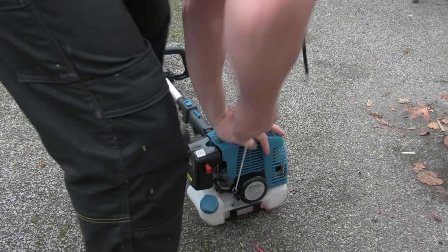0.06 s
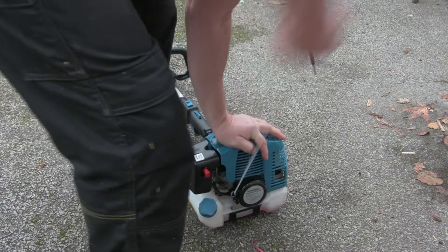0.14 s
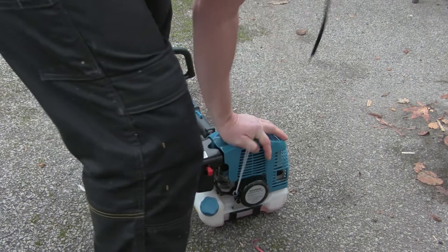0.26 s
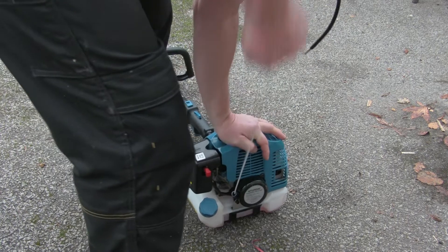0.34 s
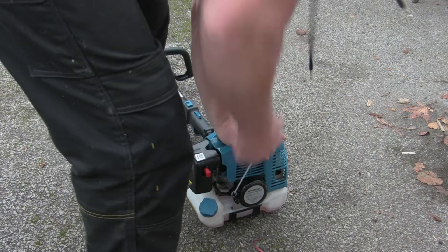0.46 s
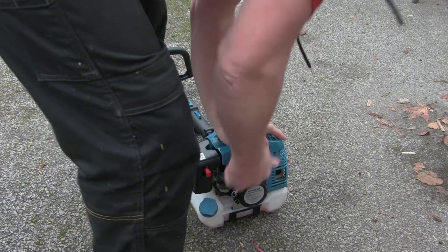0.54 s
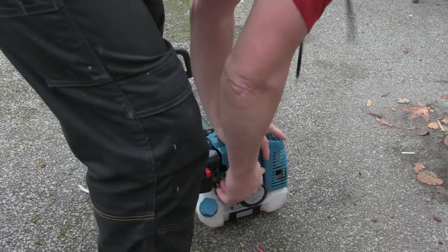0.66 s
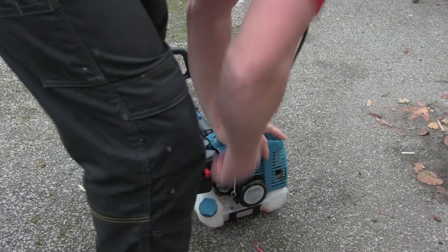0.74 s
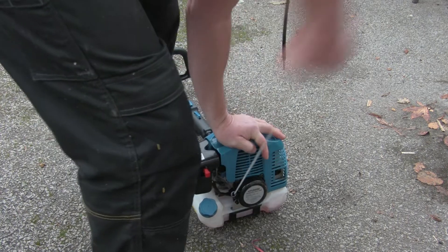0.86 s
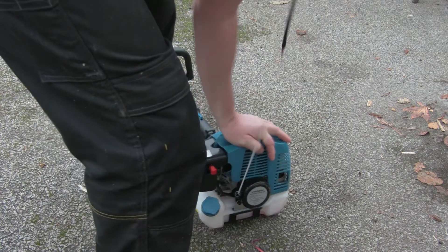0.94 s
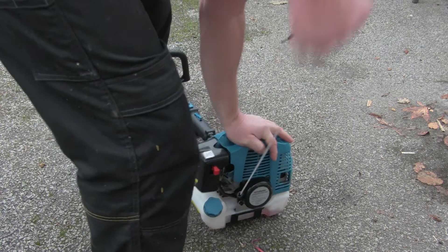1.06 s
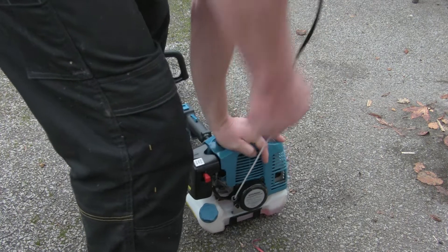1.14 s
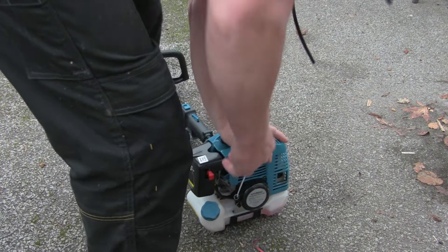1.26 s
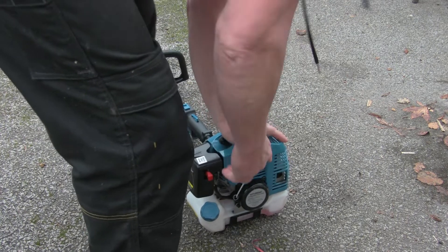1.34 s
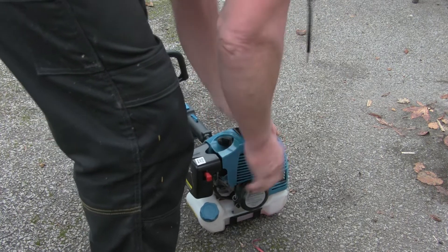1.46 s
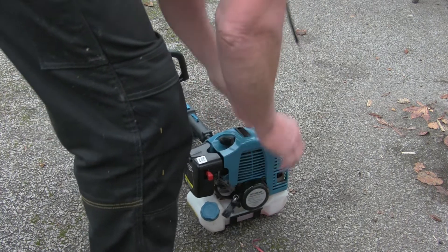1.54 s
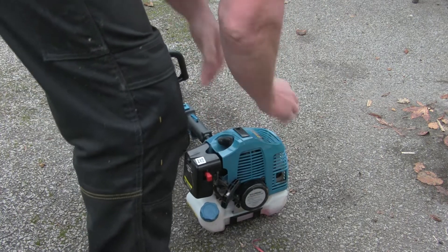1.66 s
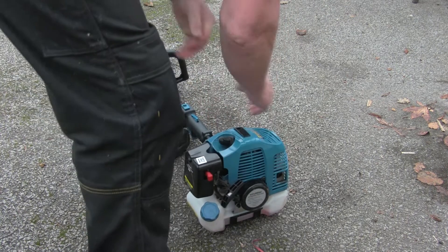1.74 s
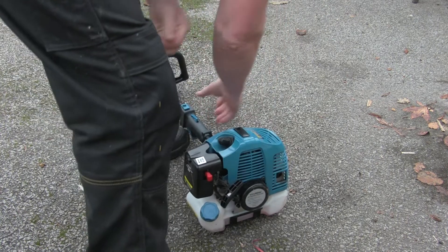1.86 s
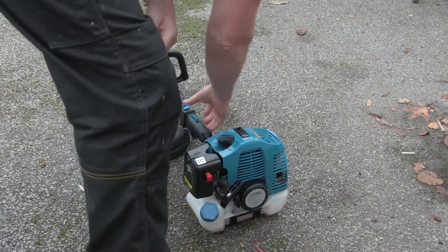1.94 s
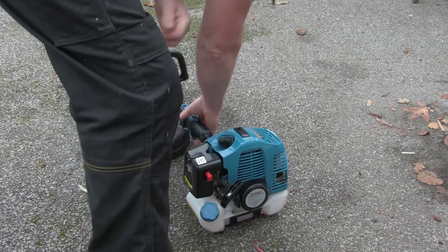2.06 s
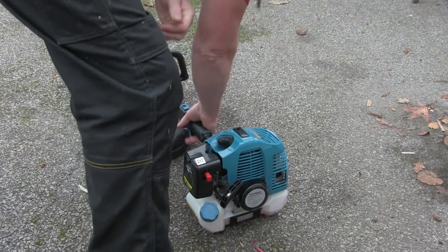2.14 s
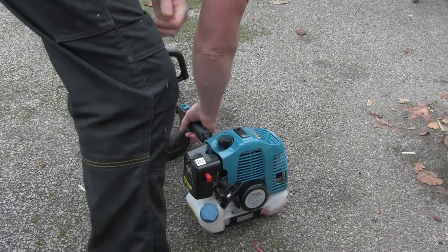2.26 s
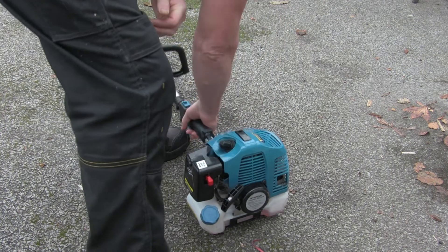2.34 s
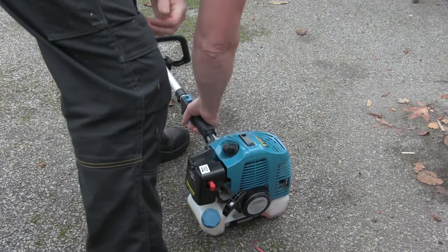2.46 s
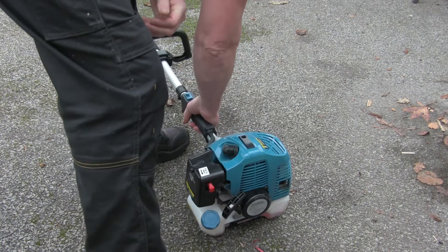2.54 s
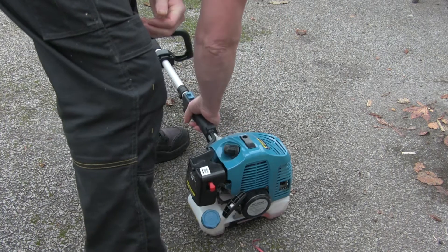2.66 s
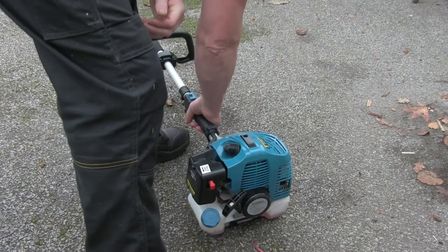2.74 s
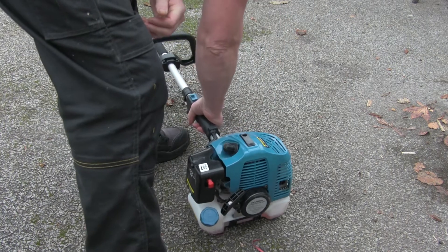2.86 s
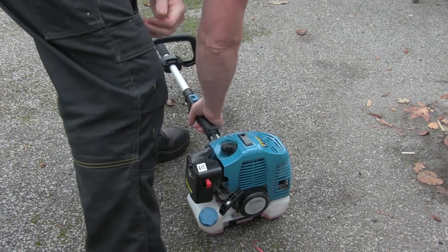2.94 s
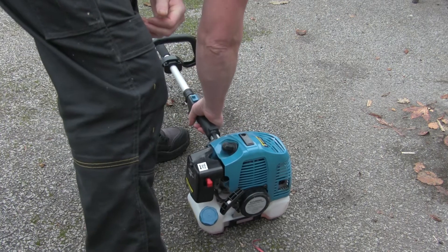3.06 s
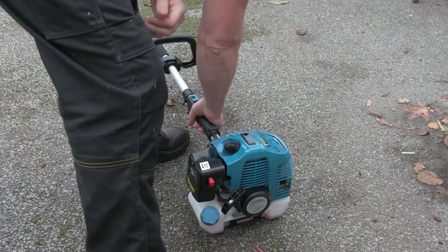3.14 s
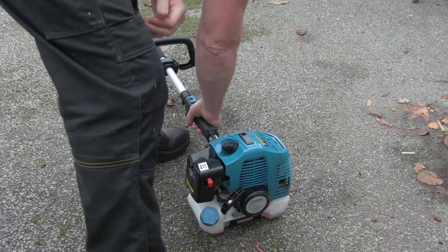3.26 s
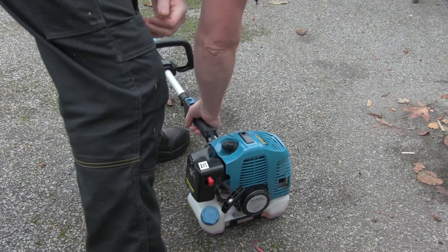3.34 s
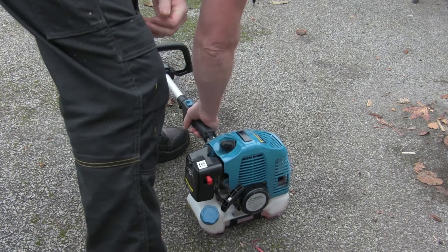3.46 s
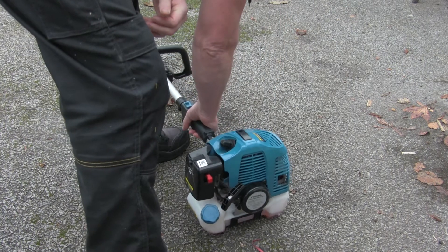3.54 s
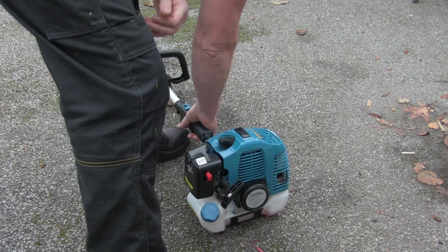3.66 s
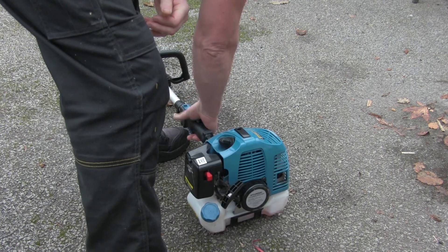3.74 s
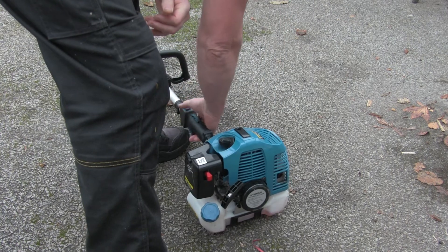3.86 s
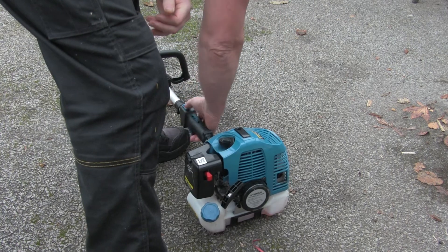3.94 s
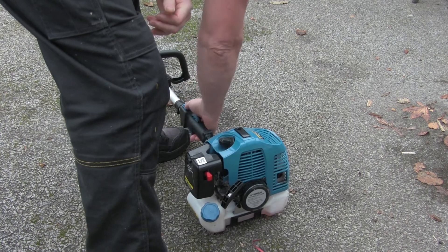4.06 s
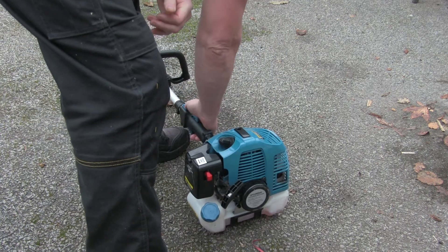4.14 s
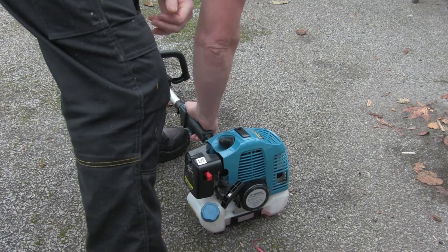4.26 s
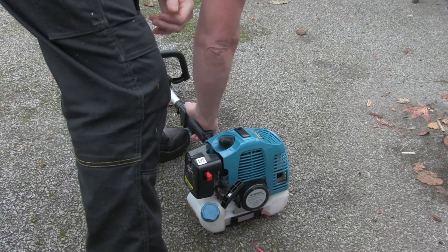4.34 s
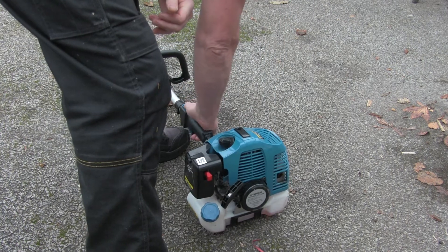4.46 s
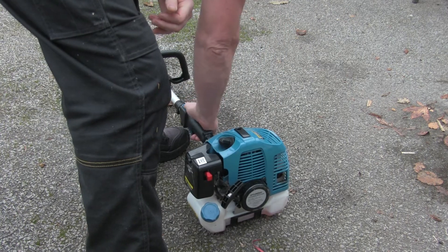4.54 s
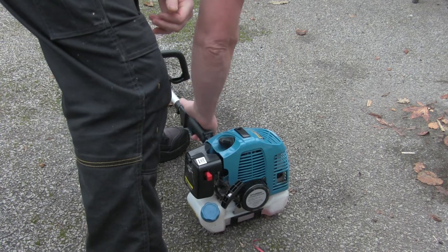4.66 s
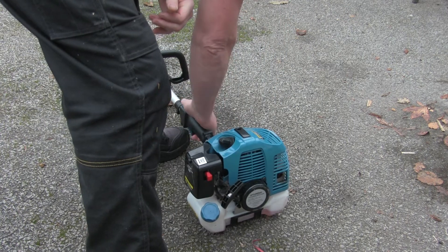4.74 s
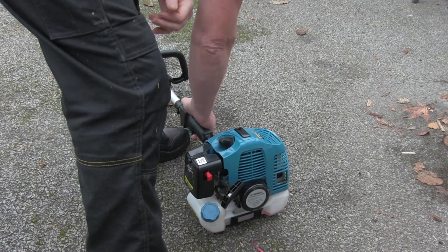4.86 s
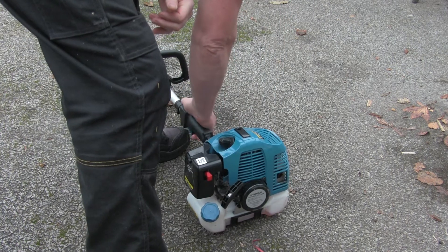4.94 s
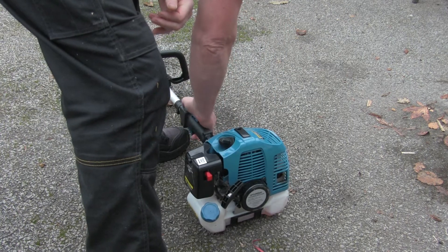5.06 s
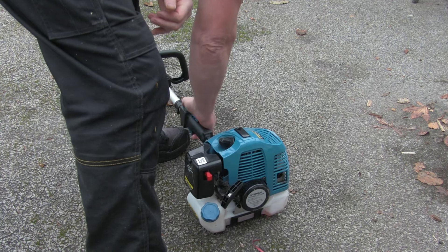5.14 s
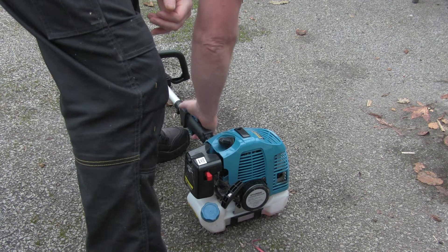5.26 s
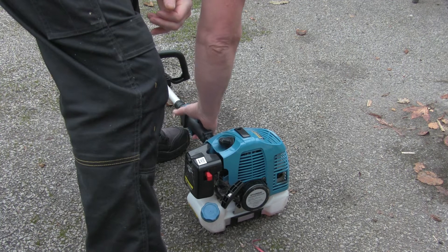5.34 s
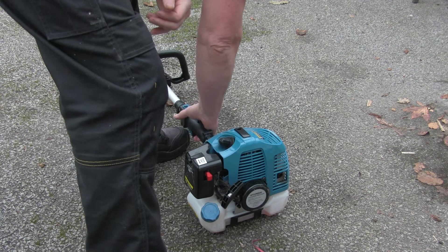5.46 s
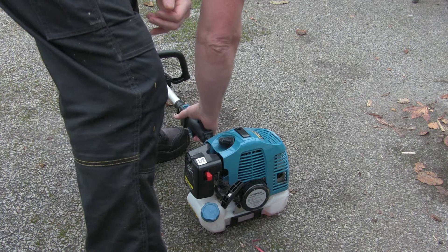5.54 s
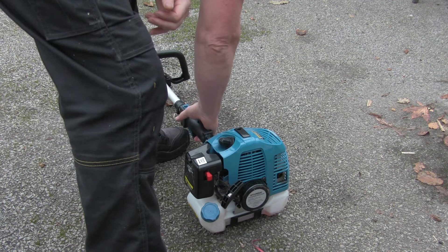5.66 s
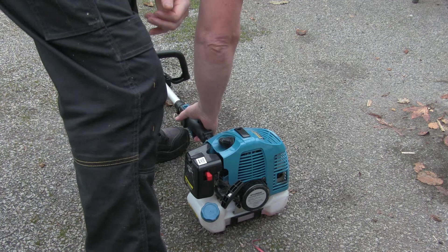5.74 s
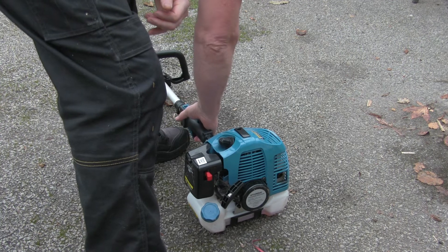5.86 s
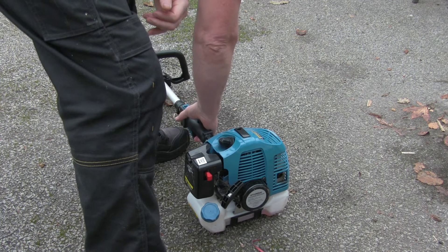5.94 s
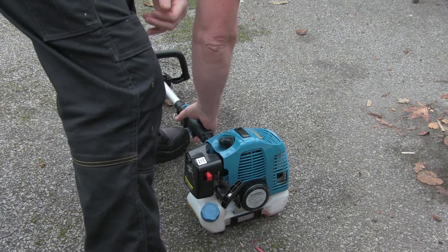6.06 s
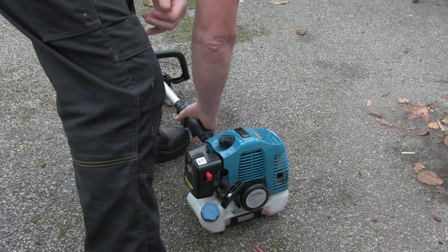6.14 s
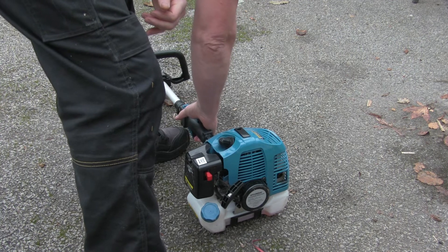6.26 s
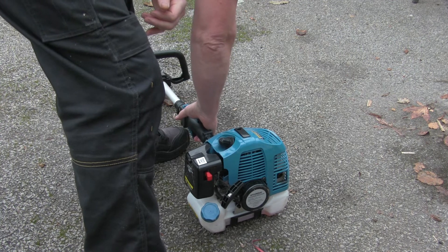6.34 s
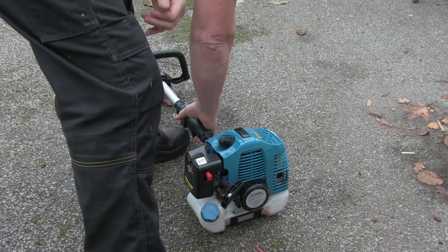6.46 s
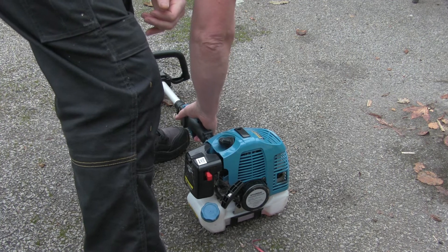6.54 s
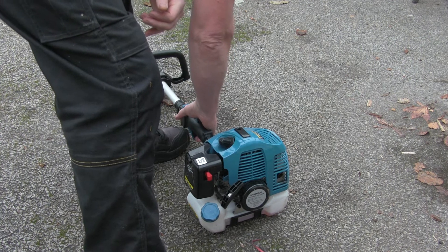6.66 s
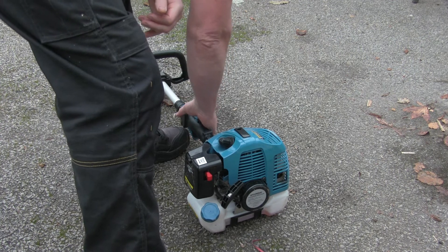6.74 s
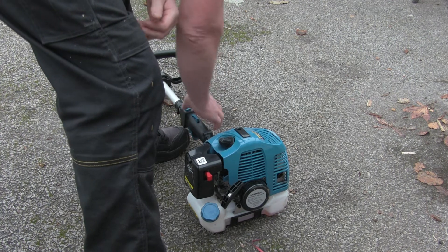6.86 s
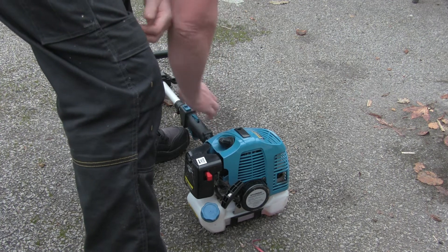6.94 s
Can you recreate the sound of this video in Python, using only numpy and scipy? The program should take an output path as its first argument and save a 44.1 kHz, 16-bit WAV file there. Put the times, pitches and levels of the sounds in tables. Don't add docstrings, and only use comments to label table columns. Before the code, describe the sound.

Close outdoor stereo, machine slightly right of centre, short scatter from ground and walls, faint far traffic and hiss throughout. From 0.1 s the first cord pull: gritty rub, housing rocking, and six or seven hollow low muffler puffs about 30 ms apart, slowing until 0.4. Pawls slap, then ratchet brightly on steel at 0.39-0.62 as the cord rewinds. The handle bumps plastic at 0.65; a hard snap at 0.8 starts the second pull, chuffing 0.84-1.18, ratcheting 1.16-1.4. The engine never fires. At 1.48-1.66 the handle drops back, a snap and several clattering bounces. Then quiet: tiny finger ticks and soft rubbing from 1.7, a grip shift at 2.33, a sharp trigger snap with ringing tube at 2.58. At 3.7 the shaft tilts with a rattle and knocks; small clicks at 4.28 and 4.98. Very faint bird whistles, falling at 5.4, rising at 6.0; only traffic remains until 7.

```python
import sys
import numpy as np
from scipy import signal
from scipy.fft import rfft, irfft, next_fast_len
from scipy.io import wavfile
from scipy.ndimage import map_coordinates

SR = 44100
rng = np.random.default_rng(int(sys.argv[2]) if len(sys.argv) > 2 else 0)


def makeup_ratio(level_db):
    decades = np.asarray(level_db, float) / 20
    return 10 ** decades


def output_pcm(signal):
    pcm = np.clip(np.atleast_2d(signal).T, -1, 1) * 32767
    wavfile.write(sys.argv[1], SR, np.round(pcm).astype(np.int16))


N = 309141

# start [s], peak [dB], rim ring [dB], wall ring [dB].
RATCHET = [(.389, -8, -24, -43), (.4055, 0, -20.5, -25), (.4194, -4.5, -19, -15.5),
           (.4354, -3, -17.5, -11.5), (.4474, -6.5, -8.5, -15.5), (.4604, -6.5, -16, -22.5),
           (.4723, -1, -22.5, -18.5), (.4874, -3.5, -25, -21.5), (.5132, -6, -24, -24),
           (.5427, -11, -24.5, -20.5), (.5756, -8.5, -28.5, -28.5), (.623, -16, -36.5, -37.5),
           (1.1568, -9, -27.5, -40), (1.1737, -2.5, -15.5, -26.5), (1.1874, -2, -18.5, -20),
           (1.2024, -4, -24.5, -13), (1.2161, -6.5, -18, -26), (1.2314, -6, -12.5, -22.5),
           (1.2454, -7.5, -11, -19.5), (1.2604, -5, -21, -21), (1.2744, -17.5, -35.5, -29),
           (1.3384, -11, -37, -40.5), (1.3962, -10.5, -34.5, -43)]
# start [s], peak [dB], rim ring [dB], wall ring [dB].
CATCHES = [
    (0.2427, -4.5, -21, -33),
    (0.2557, -9, -23, -32),
    (0.3006, -5, -26.5, -32.5),
    (.3237, -0.5, -20.5, -32),
    (.9773, -3.5, -19, -33.5),
    (1.0278, -10.5, -29.5, -29),
    (1.0738, -5.5, -18, -20.5),
    (1.094, .5, -18.5, -20),
]
# start [s], peak [dB], knock [dB], loudest note [Hz], note level [dB].
BUMPS = [
    (0.6501, -7, 0, 1103, -15),
    (0.6868, -17.5, -2, 1713, -23.5),
    (1.5135, -12, -11, 916.4, -10.5),
    (1.5328, -1, -12.5, 826.4, -9.5),
    (1.5528, -1.5, -18, 1130, -14),
    (1.562, -10, -10, 3566, -12),
    (1.5799, -11.5, -18.5, 4425, -20),
    (1.6005, -12.5, 6.5, 345.6, -9.5),
    (1.603, -28.5, -8.5, 1164, -10),
    (1.6624, -17.5, -16.5, 3916, -24.5),
]
# start [s], peak [dB], bright part [dB], note [Hz].
TICKS = [(1.7308, -35, -24.5, 4100), (1.766, -38, -20.5, 3800), (1.8393, -32.5, -34, 3460),
         (1.8579, -36.5, -21, 3500), (2.082, -34.5, -9, 4160), (2.2015, -34, -26, 3750),
         (2.5023, -38, -0.5, 4506), (2.5282, -36, -9, 3230), (2.543, -42.5, 0.5, 3800),
         (3.4254, -42, -24, 4140), (3.469, -46, -18, 4100), (3.515, -51.5, -1, 3775),
         (3.5808, -48, 1, 3540), (3.6706, -37.5, 3, 4410), (4.2138, -39, -9.5, 3366),
         (4.6292, -41.5, 1, 3800), (4.974, -28.5, -16, 4020), (4.986, -30, -14, 3320)]
TICK_T60_S = 0.0386


def unit(x):
    return x / np.sqrt(np.mean(x ** 2) + 1e-20)


def along(points, hz):
    f, v = np.transpose(points)
    return np.interp(np.log(hz + 1), np.log(f + 1), v)


def curves(rows):
    s, *cols = np.transpose(rows)
    return [np.interp(np.arange(N) / SR, s, col) for col in cols]


def wobble(rate_hz):
    knots = rng.standard_normal(int(N * rate_hz / SR) + 4)
    return map_coordinates(knots, [np.arange(N) * rate_hz / SR])


def filtered(x, response):
    m = next_fast_len(N + SR // 2)
    gain = response(np.fft.rfftfreq(m, 1 / SR))
    gain = gain / np.sqrt(np.mean(abs(gain) ** 2, -1, keepdims=True))
    return irfft(rfft(x, m) * gain, m)[..., :N]


def resonances(peaks):
    def response(f):
        return sum((-1) ** k * makeup_ratio(db) * 1j * f * width / (hz * hz - f * f + 1j * f * width)
                   for k, (hz, width, db) in enumerate(peaks))
    return response


def nearby(side_db):
    mid, side = rng.standard_normal((2, N))
    side = makeup_ratio(side_db) * side
    return np.array([mid + side, mid - side])


def rush(spectrum):
    # frequency [Hz], left-right likeness [0-1].
    alike = [(60, .9), (290, 0.85), (640, 0.56), (1400, 0.5), (3100, 0.088), (7000, 0.757), (15000, 0.36)]
    m = next_fast_len(N)
    hz = np.fft.rfftfreq(m, 1 / SR)
    turn = np.arccos(np.clip(along(alike, hz), -1, 1)) / 2
    gain = makeup_ratio(along(spectrum, hz)) * [np.cos(turn), np.sin(turn)]
    mid, side = irfft(rfft(rng.standard_normal((2, m))) * gain, m)[:, :N]
    return unit(np.array([mid + side, mid - side]))


def bursts(times, dbs, t60s, holds, crack_db):
    power, t = np.zeros(N + SR), np.arange(SR // 4) / SR
    crack = makeup_ratio(2 * (crack_db - 60 * t / 0.0066))
    for s, db, t60, hold in zip(times, dbs, t60s, holds):
        fall = makeup_ratio(-120 * np.maximum(t - abs(hold), 0) / max(t60, .005))
        power[round(s * SR):][:len(t)] += makeup_ratio(2 * db) * (fall + crack)
    return np.sqrt(power[:N])


def ringing(rows, blur_hz):
    out = np.zeros(N + SR)
    for s, hz, db, t60 in rows:
        t = np.arange(round(min(t60, .5) * SR)) / SR
        step_rad = np.sqrt(2 * np.pi * blur_hz * hz / 4000 / SR)
        drift = np.cumsum(rng.standard_normal(len(t))) * step_rad
        swell = 1 - np.exp(-t * hz)
        out[round(s * SR):][:len(t)] += makeup_ratio(db - 60 * t / t60) * swell * np.sin(2 * np.pi * hz * t + drift)
    return out[:N]


def traffic():
    # time [s], tyre roar [dB].
    passing = [
        (1.75, -37.5),
        (1.95, -38),
        (2.8, -38.5),
        (3.18, -40.5),
        (5.64, -38.5),
        (6.82, -40.5),
        (7.0, -40),
    ]
    # frequency [Hz], level [dB per Hz].
    rumble_colour = [(12, -59), (20, -20), (80, -1.5), (177, 0.5), (323, -1.5), (400, -9.5), (520, -37),
                     (880, -120)]
    roar_colour = [(180, -25.5), (300, -9), (587, -4), (967, -2), (1210, -7.5), (1770, -10), (4000, -35),
                   (8800, -120)]
    rumble_db = -6
    roar_db, = curves(passing)
    rumble = makeup_ratio(roar_db + rumble_db + .8 * wobble(4)) * rush(rumble_colour)
    roar = makeup_ratio(roar_db + .6 * wobble(11)) * rush(roar_colour)
    return (rumble + roar) * makeup_ratio([[.3], [-.3]])


def hiss():
    # frequency [Hz], level [dB per Hz].
    hiss_colour = [(1760, -33.5), (3000, -3), (4320, -2.5), (15100, -13), (16200, -26.5), (16500, -48.5)]
    hiss_db = -62.5
    return makeup_ratio(hiss_db) * rush(hiss_colour)


def bird():
    # time [s], pitch [Hz], level [dB].
    glides = [
        (5.35, 5400, -80),
        (5.385, 5050, -65),
        (5.43, 4700, -67),
        (5.45, 4550, -82),
        (5.99, 5950, -82),
        (6.01, 6020, -69),
        (6.035, 6300, -69),
        (6.05, 6400, -82),
    ]
    hz, db = curves(glides)
    return makeup_ratio(db) * (db > -79.9) * np.sin(2 * np.pi * np.cumsum(hz) / SR)


def shaft():
    # start [s], level [dB].
    blows = [
        (2.582, -26),
        (3.771, -45),
    ]
    # frequency [Hz], level [dB], t60 [s].
    modes = [(1550, -1, .16), (2627, 0, .15), (3009, -12, .15), (4060, -9, .45), (4985, -12, .22),
             (6013, -14, .12)]
    rows = [(s, hz, db + level, t60) for s, db in blows for hz, level, t60 in modes]
    return ringing(rows, blur_hz=14)


def cavities(f):
    # frequency [Hz], width [Hz], level [dB].
    hollow_modes = [(302, 110, -9), (491, 97.8, 8.5), (806, 400, 6), (1200, 653, 5.5)]
    return resonances(hollow_modes)(f) * (1j * f / (200 + 1j * f)) ** 2


def cord():
    # top [s], rise [s], fall [s], scrape [dB], cavity drumming [dB].
    strokes = [
        (.29, 0.224, 0.1, -26, -29.5),
        (.45, 0.063, 0.154, -37.5, -31),
        (.8, .004, 0.116, -24.5, -41.5),
        (1.04, .3, 0.187, -27, -25.5),
        (1.19, 0.049, .21, -32, -30.5),
        (1.607, .15, 0.041, -55.5, -32.5),
        (3.71, .02, 0.137, -38.5, -38.5),
        (2.03, .09, 0.4, -51, -52),
        (2.2, .3, 0.085, -60.5, -54.5),
    ]
    # frequency [Hz], level [dB per Hz].
    friction_colour = [(710, -29.5), (1200, -0.5), (2450, -1), (2680, 1.5), (4700, -4), (6030, -4.5),
                       (12100, -12.5), (16000, -25)]
    drop_db = 23
    t = np.arange(N) / SR
    scrape, drum = np.zeros((2, N))
    for top, rise, fall, scrape_db, drum_db in strokes:
        stroke = makeup_ratio(-drop_db * np.maximum((top - t) / rise, (t - top) / fall))
        scrape = scrape + stroke * makeup_ratio(scrape_db)
        drum = drum + stroke * makeup_ratio(drum_db)
    grit = unit(makeup_ratio(3 * wobble(700) + 2 * wobble(60)))
    rub = scrape * filtered(nearby(-19) * grit, lambda hz: makeup_ratio(along(friction_colour, hz)))
    return rub + drum * makeup_ratio(-1 + 2.3 * wobble(50)) * filtered(nearby(-11.5), cavities)


def notes():
    # start [s], frequency [Hz], level [dB].
    clinks = [
        (.168, 7700, -23),
        (.902, 7500, -20),
        (1.028, 3683, -8.5),
        (1.095, 5704, -10.5),
        (3.694, 1406, -24),
        (3.764, 1200, -33),
        (3.776, 1899, -25.5),
        (4.279, 2360, -29.5),
        (4.279, 1514, -29),
    ]
    # start [s], frequency [Hz], level [dB].
    covers = [
        (.252, 551, -13),
        (.801, 2683, -28.5),
        (1.096, 2744, -16.5),
        (1.216, 3950, -15.5),
        (1.232, 3940, -15),
        (2.585, 505.6, -29),
        (3.697, 212.2, -24),
        (3.725, 209.5, -25.5),
        (3.78, 2946, -39),
    ]
    # frequency [Hz], level [dB], t60 [s].
    handle_modes = [(1593.7, -3.5, .07), (2053, 1, .04)]
    away_db = 7
    note_t60_s, shortening, cover_t60_s = .05, .3, 0.1398
    short = clinks + [(s, hz, db) for s, _, _, hz, db in BUMPS]
    rows = [(s, hz, db, note_t60_s * (1000 / hz) ** shortening) for s, hz, db in short]
    rows += [(s, hz, db + level - away_db * abs(np.log2(hz / note)), t60)
             for s, _, _, note, db in BUMPS for hz, level, t60 in handle_modes]
    rows += [(s, hz, db - 9, TICK_T60_S) for s, db, _, hz in TICKS]
    rows += [(s, hz, db, cover_t60_s) for s, hz, db in covers]
    return ringing(rows, blur_hz=110)


def cup():
    # frequency [Hz], width [Hz], level [dB].
    rim_modes = [(9035, 105, 0), (11600, 100, -10), (14800, 100, -20), (15510, 50, -13), (8530, 130, -16),
                 (9055, 7, -11)]
    wall_modes = [(6365, 90, 0), (3900, 200, -13)]
    s, _, rim_db, wall_db = np.transpose(RATCHET + CATCHES)
    t60, hold = np.full_like(s, .035), np.full_like(s, .005)

    def blows(db):
        return nearby(-21) * bursts(s, db - 2.5, t60, hold, crack_db=-9.5)

    return filtered(blows(rim_db), resonances(rim_modes)) + filtered(blows(wall_db), resonances(wall_modes))


def housing():
    # start [s], peak [dB], knock [dB].
    rocks = [
        (.079, -41.5, 18.5),
        (.0914, -20, -9.5),
        (.1165, -11, -5.5),
        (.157, -19.5, 8.5),
        (.1677, -10, -4),
        (.1979, -11.5, -5.5),
        (.232, -11.5, -11),
        (.9014, -10.5, -7),
        (.9318, -15, -2),
    ]
    # start [s], peak [dB], knock [dB], bright part [dB].
    snaps = [(.7996, -5, -21, -12.5), (0.8012, -0.5, -14.5, -7.5), (1.2944, -13.5, -16.5, -6.5),
             (1.4817, -11.5, -12.5, -9.5), (1.51, -0.5, -15, -8), (2.5762, -17, -5.5, -16),
             (2.5806, -0.5, -12.5, -2.5), (3.7618, -20, -2, -7.5), (3.7701, -23.5, -1, -6.5),
             (4.279, -21, -6, -6), (4.3082, -29, -22, -5)]
    # start [s], peak [dB], knock [dB], hold [s].
    shudders = [
        (.2433, -3.5, -13, .028),
        (.9711, -4, -9, 0.0143),
        (2.3329, -33.5, -4.5, .028),
        (3.6905, -16.5, -5, .018),
    ]
    # frequency [Hz], width [Hz], level [dB].
    shell_modes = [(1980, 1500, -4.5), (2700, 350, 1.5), (3070, 360, 1), (3750, 648, 2), (5620, 2500, -2.5)]
    bright_modes = [(7500, 1700, 2.5), (10490, 5300, -1), (14900, 4500, -7)]
    # bright part [dB], t60 [s].
    rock_kind = (-11, 0.14)
    bump_kind = (-22.5, 0.038)
    rattle_kind = (-11.5, .045)
    pawl_knock_db, pawl_t60_s = -17.5, 0.077
    pawl_bright_db, bright_per_ring = -17.5, .35
    tick_knock_db, snap_t60_s = -16, 0.0626

    # start s, peak dB, knock dB, bright dB, t60 s, hold s
    contacts = [(s, db, pawl_knock_db, pawl_bright_db + bright_per_ring * ring_db - db, pawl_t60_s, 0)
                for s, db, ring_db, _ in RATCHET + CATCHES]
    contacts += [(s, db, knock_db, *rattle_kind, hold) for s, db, knock_db, hold in shudders]
    contacts += [(s, db, knock_db, *rock_kind, 0) for s, db, knock_db in rocks]
    contacts += [(s, db, knock_db, *bump_kind, 0) for s, db, knock_db, _, _ in BUMPS]
    contacts += [(*row, snap_t60_s, 0) for row in snaps]
    contacts += [(s, db, tick_knock_db, bright_db, TICK_T60_S, 0) for s, db, bright_db, _ in TICKS]
    s, db, knock_db, bright_db, t60, hold = np.transpose(contacts)

    def damped_shell(f):
        return resonances(shell_modes)(f) / (1 + 1j * f / 6000) ** 2

    grit = makeup_ratio(1.8 * wobble(500))
    touch = np.bincount(np.round(s * SR).astype(int), makeup_ratio(db), N)
    rattle = nearby(-17.5) * grit * bursts(s, db - 12.5, 1.043 * t60, hold, crack_db=1.5)
    knock = nearby(-11.5) * bursts(s, db + knock_db - 6.5, 1.273 * t60, hold, crack_db=-1.0)
    contact = nearby(-12) * grit * bursts(s, db + bright_db - 9.5, 0.53 * t60, hold, crack_db=5.5)
    shell = filtered(touch + rattle, damped_shell)
    hollow = filtered(knock, cavities)
    bright = filtered(contact, resonances(bright_modes))
    return shell + hollow + bright + notes()


def exhaust():
    # time of the wavelet's peak [s], peak [dB].
    chuffs = [(0.1202, -15), (.144, -20.5), (0.1663, -6), (0.2002, -6), (0.2332, -7), (0.2728, -9.5),
              (0.338, -10), (0.4092, -20.5), (0.8365, -29), (0.8742, -17.5), (0.9012, -6), (0.9349, -7.5),
              (0.9667, -4.5), (1.0023, -11), (1.048, -9), (1.106, -13.5), (1.1809, -22)]
    # delay [s], level [dB].
    returns = [(.0054, -4), (.0098, -12), (0.0119, -14)]
    # frequency [Hz], width [Hz], level [dB].
    chambers = [(184, 94, -1.5), (330.3, 130, -2), (445, 71.84, -7), (540.25, 42, -6)]
    lead = 300
    pulses, t = np.zeros(N), np.arange(-lead, 1000) / SR

    def wavelet(lag_s, hz):
        square = (np.pi * hz * (t - lag_s)) ** 2
        return (1 - 2 * square) * np.exp(-square)

    for s, db in chuffs:
        shape = wavelet(0, 290)
        for lag_s, back_db in returns:
            shape = shape + makeup_ratio(back_db + 1.5 * rng.normal()) * wavelet(lag_s, 240)
        pulses[round(s * SR) - lead:][:len(t)] += makeup_ratio(db) * shape
    s, db = np.transpose(chuffs)
    flow = bursts(s + 0.0047, db - 22.5, np.full_like(s, .13), np.full_like(s, .008), crack_db=-29.5)
    return pulses + filtered(nearby(-14.5) * flow, resonances(chambers))


def yard(x):
    t = np.arange(SR // 4) / SR
    quick = makeup_ratio(-60 * t / .08)
    wash = makeup_ratio(-18.0 - 60 * t / 0.97 - 60 * np.maximum(t - .085, 0) / .15)
    tail = rng.standard_normal((2, len(t))) * (quick + wash)
    delayed = np.pad(x, ((0, 0), (400, 0)))
    return signal.fftconvolve(delayed, tail / np.linalg.norm(tail[0]), axes=1)[:, :N]


def scene():
    background = traffic() + hiss() + bird()
    machine = (shaft() + cord() + cup() + housing() + exhaust()) * makeup_ratio([[-.45], [.45]])
    return background + machine + makeup_ratio(-9.5) * yard(machine)


def roll_off(x):
    return signal.sosfilt(signal.butter(12, 16810, fs=SR, output="sos"), x)


def record(dry):
    capped = dry / (1 + abs(dry / 0.95) ** 6) ** (1 / 6)
    m = next_fast_len(N + SR // 2)
    hz = np.fft.rfftfreq(m, 1 / SR)
    bass_cut = (1j * hz / (40 + 1j * hz)) ** 2
    treble_cut = makeup_ratio(along([(15700, 0.5), (16000, -26.5), (16800, -33.0), (16900, -58.5)], hz))
    mix = irfft(rfft(capped, m) * bass_cut * treble_cut, m)[:, :N]
    return roll_off(mix)


dry = scene()
out = record(dry)
output_pcm(out)
```